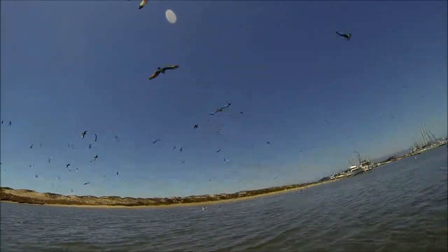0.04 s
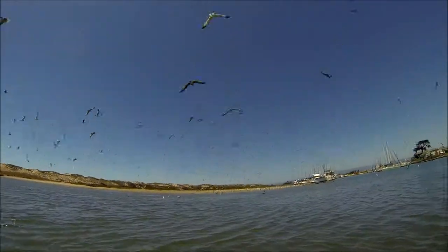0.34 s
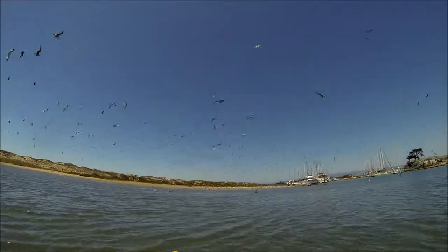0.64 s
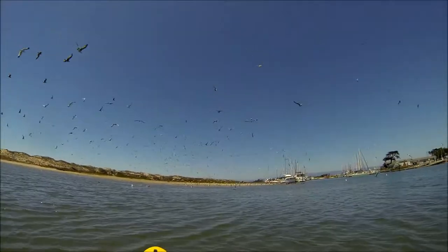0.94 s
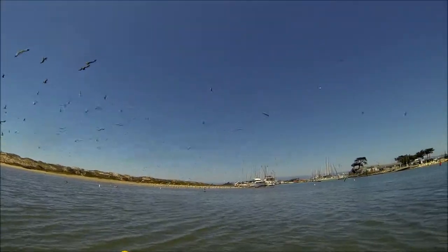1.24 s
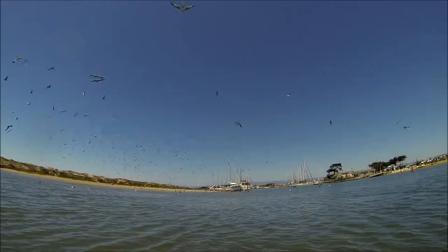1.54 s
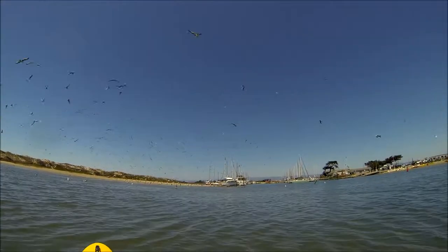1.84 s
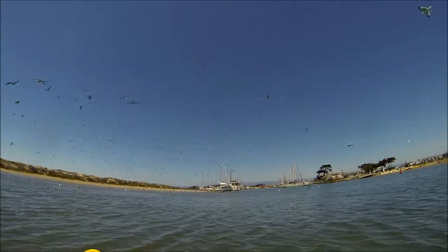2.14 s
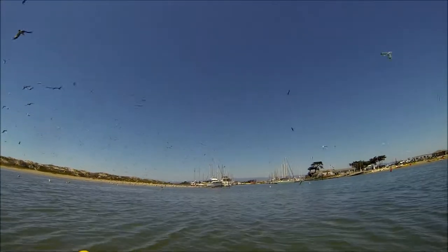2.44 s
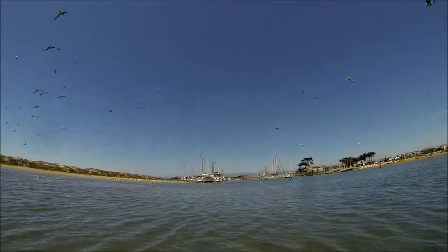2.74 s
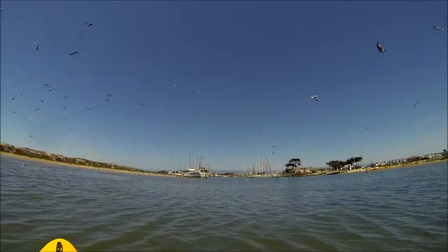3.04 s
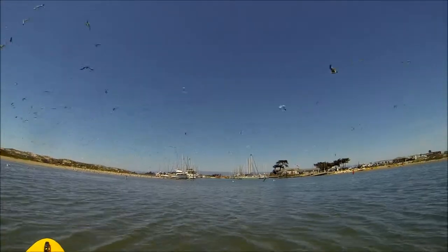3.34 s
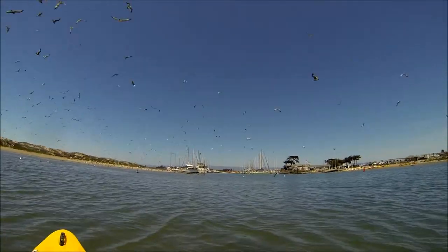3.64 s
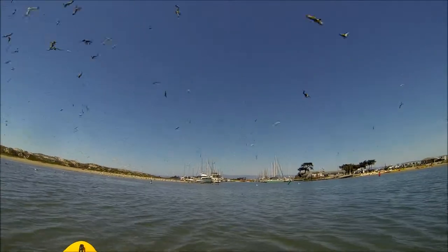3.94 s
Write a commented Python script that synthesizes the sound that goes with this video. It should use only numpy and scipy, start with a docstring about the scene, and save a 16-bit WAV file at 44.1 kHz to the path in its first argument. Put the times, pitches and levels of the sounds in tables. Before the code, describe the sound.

A colony of gulls cries and squawks over calm water, with low wind on the microphone. A small wave thumps the kayak once, then the wind buffets harder and the squawks thin out before crowding in again.

```python
"""A gull colony calls across a harbour, heard from a kayak on calm water.
From the start, wind rumbles on the microphone over a soft wash, distant chatter and a faint camera whine.
Clear gliding cries and harsh squawks, pulsed through throat and bill, stand out with a short shore echo.
Just before 1.9 s one small wave slaps and thumps the hull. The squawks thin out, the wind buffets
harder, and from about 3 s the squawks crowd in again among the cries."""
import sys
import numpy as np
from scipy import signal
from scipy.fft import rfft, irfft
from scipy.io import wavfile

SR = 44100
rng = np.random.default_rng(int(sys.argv[2]) if len(sys.argv) > 2 else 0)


def transcribe(signal):
    """Save signal, clipped to [-1, 1], as a 16-bit WAV file at the path in sys.argv[1]."""
    frames = np.atleast_2d(signal).T
    limited = np.clip(frames, -1, 1)
    pcm = np.round(limited * 32767).astype(np.int16)
    wavfile.write(sys.argv[1], SR, pcm)


N = 176400
T = np.arange(N) / SR


def amp(db):
    """Decibels to gain."""
    return 10 ** (np.asarray(db) / 20)


def unit(x):
    """Scales to rms 1."""
    return x / np.sqrt(np.mean(x ** 2) + 1e-20)


def level_at(spectrum, hz):
    """Reads an EQ curve on a log-frequency axis."""
    freqs, levels = np.transpose(spectrum)
    return np.interp(np.log(hz + 1), np.log(freqs + 1), levels)


def colour(x, spectrum, tilt_db=0):
    """Applies an EQ curve, tilted by tilt_db per octave; rms 1."""
    hz = np.fft.rfftfreq(len(x), 1 / SR)
    gain = amp(level_at(spectrum, hz) + tilt_db * np.log2(hz / 1000 + .01))
    return unit(irfft(rfft(x) * gain, len(x)))


def wander(size, rate_hz):
    """Smooth random modulation up to about rate_hz; rms 1."""
    padded = size + SR // 4
    hz = np.fft.rfftfreq(padded, 1 / SR)
    return unit(irfft(rfft(rng.standard_normal(padded)) / (1 + (hz / rate_hz) ** 4)))[:size]


def add(mix, start_s, sound):
    """Mixes a sound in at a time."""
    part = mix[max(round(start_s * SR), 0):][:len(sound)]
    part += sound[:len(part)]


def camera_whine():
    """Faint, steady high tones from the camera."""
    # whine tones: (frequency [Hz], rms level [dB])
    tones = [(10643, -84), (10691, -94), (13189, -89.5)]
    return sum(np.sqrt(2) * amp(db) * np.sin(2 * np.pi * hz * T) for hz, db in tones)


def water_wash():
    """A gently wavering bed of open water and microphone hiss."""
    # wash and hiss EQ: (frequency [Hz], relative level [dB])
    spectrum = [(100, -13.5), (250, 5.5), (385, 1.5), (480, 0), (700, -2), (950, -6), (2000, -13),
                (4000, -16), (6500, -23), (8300, -24), (10000, -39), (12000, -42), (13500, -25),
                (15300, -30)]
    return amp(-63.5) * colour(rng.standard_normal(N), spectrum) * amp(.5 * wander(N, rate_hz=2.7))


def wind():
    """Wind on the microphone: deep buffeting and a lighter rumble, each with its own gusts."""
    # wind EQ: (frequency [Hz], relative level [dB])
    spectrum = [(0, -70), (4, -48), (10, 0.5), (18, -5), (28, 1), (47, -2), (65, -12.5), (100, -17),
                (125, -19), (160, -28), (220, -36.5), (320, -55), (600, -63), (1500, -94)]
    # gusts of the deep buffeting: (time [s], level [dB])
    buffet = [(0, -36.5), (.9, -35.5), (1.7, -37), (2.0, -28), (2.35, -32.5), (2.9, -28), (3.15, -28.5),
              (3.35, -38), (3.55, -30.5), (4, -35.5)]
    # gusts of the upper rumble: (time [s], level [dB])
    rumble = [(0, -47.5), (.5, -40), (1.1, -45), (1.3, -37), (1.5, -45.5), (2.1, -41), (2.6, -47.5),
              (3.3, -45), (4, -46.5)]
    crossover_hz = 58.8
    low_share = 1 / (1 + (np.fft.rfftfreq(N, 1 / SR) / crossover_hz) ** 8)
    out = np.zeros(N)
    for share, gusts in ((low_share, buffet), (1 - low_share, rumble)):
        noise = colour(rng.standard_normal(N), spectrum)
        band = unit(irfft(rfft(noise) * np.sqrt(share), N))
        out += band * amp(np.interp(T, *np.transpose(gusts)))
    return out


def shore_echo(x, t60_s=.22):
    """A short tail of scattered reflections from water, boats and bank."""
    t = np.arange(SR) / SR
    reflections = rng.standard_normal(SR) * (rng.random(SR) < .05)
    tail = reflections * amp(-60 * t / t60_s) * (t > .004)  # 4 ms pre-delay
    return amp(-8.5) * signal.fftconvolve(x, tail / np.linalg.norm(tail))[:N]


def colony(calls_per_s=10):
    """Many far cries, smeared by echoes, over a blur of farther ones."""
    # distant chatter EQ: (frequency [Hz], relative level [dB])
    spectrum = [(800, -42), (1130, -14), (1330, -5), (1480, -2), (1680, -6.5), (1950, -16.5), (2300, -19.5),
                (2700, -13.5), (3200, -21.5), (3900, -27), (5200, -29.5), (7000, -32)]
    blur = amp(-61.3) * colour(rng.standard_normal(N), spectrum) * amp(.69 * wander(N, rate_hz=21))
    far = np.zeros(N)
    for when, pitch, size, fall in rng.random((int(calls_per_s * N / SR), 4)):
        hz = 1470 * (1 + .25 * (pitch - .5))
        db = -67 + 6 * (size - .5)
        length = .12 * (.5 + size)
        glide = (hz * .98, hz, hz * (1 - .083 * fall))
        add(far, when * N / SR, cry(length, glide, harmonics_db=(db, db - 13)))
    return blur + far + amp(10) * shore_echo(far)


def wave_slap():
    """A wave pushes the hull, splashes, and leaves it ringing briefly."""
    # thumps on the hull: (time [s], width [s], peak level [dB], pressure sign)
    pushes = [(1.856, .006, -23, -1), (1.876, .0112, -10, 1)]
    # splashes and ticks: (time [s], decay [s], level [dB], brightness [dB/octave])
    splashes = [(1.848, .006, -42, -1), (1.853, .008, -33, -2), (1.868, .012, -42, -4),
                (1.8745, .006, -44.5, 6), (1.886, .0008, -53, 6)]
    # splash EQ: (frequency [Hz], relative level [dB])
    spectrum = [(200, -0.5), (600, -10.5), (1100, 1.5), (2000, 6), (2700, -21), (4000, -17), (7000, -30),
                (10000, -39), (15000, -59)]
    # hull resonances: (frequency [Hz], level [dB], time to fall 60 dB [s])
    hull_modes = [(147, -38, 0.13), (378, -47.5, 0.26), (723, -52, 0.16), (1040, -49.5, .15)]
    out, t = np.zeros(N), np.arange(SR // 4) / SR
    for when, width, db, sign in pushes:
        u = ((T - when) / width) ** 2
        out += np.sign(sign) * amp(db) * (1 - 2 * u) * np.exp(-u)  # a pulse between two opposite swings
    for when, decay, db, brightness in splashes:
        spray = colour(rng.standard_normal(len(t)), spectrum, brightness)
        envelope = np.exp(-(t / decay) ** 2) * np.minimum(t / .00073, 1)
        add(out, when, amp(db) * spray * envelope)
    for hz, db, t60 in hull_modes:
        add(out, pushes[0][0], amp(db - 60 * t / t60) * np.sin(2 * np.pi * hz * t))
    return out


def gesture(length, pitches, attack_s, release_s):
    """One call's pitch curve through evenly spaced points, and its loudness envelope."""
    t = np.arange(int(length * SR)) / SR
    curve = np.polyfit(np.linspace(0, 1, len(pitches)), pitches, len(pitches) - 1)
    fade_in = np.sin(np.pi / 2 * np.minimum(t / attack_s, 1))
    fade_out = np.sin(np.pi / 2 * np.minimum((length - t) / release_s, 1))
    return np.polyval(curve, t / length), fade_in * fade_out


def cry(length, pitches, harmonics_db, jitter=.004, flutter_db=1.8):
    """A nearly pure gliding voice whose harmonics flutter on their way over the water."""
    hz, envelope = gesture(length, pitches, attack_s=.014, release_s=.018)
    phase = 2 * np.pi * np.cumsum(hz * (1 + jitter * wander(len(hz), rate_hz=66))) / SR
    return envelope * sum(amp(db + flutter_db * wander(len(hz), rate_hz=32)) * np.sin(k * phase)
                          for k, db in enumerate(harmonics_db, 1))


def squawk(length, pitches, db, rough, bill_hz, bill_db, bill_width_octaves=.18):
    """Unsteady pulses and puffs of noise through the throat and a bill that opens and shuts."""
    # throat and open bill EQ: (frequency [Hz], relative level [dB])
    throat = [(700, -43), (1100, -26), (1350, -0.5), (1580, 2), (1850, -8), (2150, -9), (2600, -8.5),
              (3150, -9.5), (3700, -16.5), (4400, -24.5), (5200, -22.5), (6000, -38), (10000, -67)]
    hz, envelope = gesture(length, pitches, attack_s=.24 * length, release_s=.03)
    jitter = (.005 + .026 * rough) * wander(len(hz), rate_hz=209)
    cycles = np.cumsum(hz * (1 + jitter)) / SR
    pulses = unit(sum(np.cos(2 * np.pi * k * cycles) for k in range(1, 18)))
    puffs = unit((.3 + np.exp(-(cycles % 1) / .64)) * rng.standard_normal(len(hz)))
    freqs = np.geomspace(500, 12000, 200)
    bill_peak = bill_db * np.exp(-(np.log2(freqs / bill_hz) / bill_width_octaves) ** 2 / 2)
    tract = np.column_stack([freqs, level_at(throat, freqs) + bill_peak])
    breath_share = .52 * rough
    voice = np.sqrt(1 - breath_share) * colour(pulses, tract)
    voice += np.sqrt(breath_share) * colour(puffs, tract)
    # louder calls are brighter, and the treble closes at both ends of a call
    treble = signal.sosfiltfilt(signal.butter(4, 3400, "high", fs=SR, output="sos"), voice)
    opening_db = .5 * (db + 53.5) - 6 * np.linspace(-1, 1, len(hz)) ** 2
    voice += (amp(opening_db) - 1) * treble
    rasp = amp(3.3 * rough * wander(len(hz), rate_hz=290))
    return amp(db) * envelope * unit(voice * rasp)


def near_gulls(cry_gain_db=1.7):
    """The foreground birds: clear cries and harsh squawks that can be told apart."""
    # clear cries: (time [s], length [s], start, early, late and end pitch [Hz], levels of harmonics 1, 2 and 3
    # before the cry gain [dB]); the 1.63 s row is the strong third harmonic of the squawk at 1.613 s
    cries = [(0.11, 0.1, 1389, 1407, 1367, 1269, -57, -76, -88),
             (0.343, 0.085, 1468, 1434, 1399, 1362, -49, -62, -82),
             (0.43, 0.21, 2330, 2281, 2249, 2234, -70, -92, -98),
             (0.59, 0.09, 1407, 1373, 1343, 1316, -58, -79, -88),
             (0.72, 0.09, 1379, 1431, 1437, 1400, -64, -80, -90),
             (0.85, 0.11, 1460, 1480, 1530, 1600, -53, -68, -87),
             (0.955, 0.055, 1599, 1617, 1617, 1599, -48, -70, -80),
             (1.235, 0.05, 1544, 1579, 1594, 1589, -46, -74, -87),
             (1.36, 0.11, 1446, 1423, 1368, 1279, -65, -67, -90),
             (1.365, 0.18, 2114, 2029, 1926, 1804, -59, -63, -86),
             (1.63, 0.09, 1385, 1440, 1455, 1470, -52, -64, -76),
             (1.77, 0.105, 1575, 1616, 1607, 1550, -51.5, -62, -88),
             (1.925, 0.036, 1929, 1889, 1851, 1814, -64, -84, -90),
             (1.98, 0.07, 1345, 1371, 1372, 1349, -61, -69, -87),
             (2.185, 0.084, 1431, 1444, 1450, 1449, -50, -72, -90),
             (2.23, 0.11, 1369, 1348, 1337, 1334, -70, -72, -90),
             (2.39, 0.07, 1335, 1346, 1351, 1350, -72, -73, -88),
             (2.495, 0.215, 1298, 1324, 1313, 1145, -54, -69, -69),
             (2.505, 0.13, 1409, 1528, 1573, 1545, -50, -68, -88),
             (2.73, 0.068, 1404, 1412, 1448, 1514, -58, -72, -88),
             (3.015, 0.135, 1443, 1452, 1461, 1469, -53, -68, -89),
             (3.14, 0.1, 1784, 1756, 1727, 1699, -56, -74, -90),
             (3.23, 0.12, 1596, 1668, 1674, 1615, -55, -79, -86),
             (3.27, 0.088, 1400, 1451, 1422, 1315, -50, -72, -88),
             (3.48, 0.118, 1428, 1428, 1384, 1295, -55, -78, -88),
             (3.7, 0.22, 1940, 1982, 1895, 1775, -55, -63.5, -85),
             (3.71, 0.08, 1321, 1321, 1333, 1359, -57, -65, -84),
             (3.775, 0.155, 1365, 1392, 1368, 1465, -44.5, -63, -77),
             (3.932, 0.085, 2469, 2432, 2424, 2445, -55, -89, -100),
             (3.935, 0.08, 1463, 1425, 1391, 1359, -49, -80, -88)]
    # harsh squawks: (time [s], length [s], start, middle and end pitch [Hz], level [dB],
    # roughness [0-1], bill resonance [Hz], bill boost [dB])
    squawks = [(0.077, 0.16, 530, 540, 511, -55.5, 0.73, 1320, 14.5),
               (0.309, 0.061, 665, 676, 680, -63, 0.3, 2900, 9),
               (.87, 0.099, 747, 770, 845, -55.5, 0.48, 3460, 6),
               (0.944, 0.065, 793, 793.5, 780, -48, .25, 4030, 4.5),
               (.985, 0.18, 520, 512.3, 526, -51.5, 0.59, 2450, 5),
               (1.138, 0.094, 429.7, 433.5, 423, -48.5, 0.7, 2210, 9.5),
               (1.206, .11, 526, 534, 520, -49, 0.81, 1830, 10.5),
               (1.279, .08, 537, 542, 557, -54, 0.33, 3200, 1.5),
               (1.34, 0.05, 720, 711, 716, -58, 0.2, 5100, 20.5),
               (1.613, 0.12, 456, 481.4, 487, -56.5, 0.16, 3350, 8.5),
               (1.708, 0.06, 737, 770, 735, -48.5, 0.3, 4600, 0),
               (1.747, 0.099, 629, 611, 600, -58.5, 0.26, 3460, 11),
               (2.42, .16, 507, 508, 531, -58.5, 0.88, 1370, 10),
               (2.924, 0.14, 369, 372.6, 375, -53, 0.63, 2560, 3.5),
               (3.014, 0.17, 365.5, 367.5, 366.6, -50.5, 0.63, 2810, 10),
               (3.147, 0.091, 443.6, 437.4, 433, -48, 0.97, 2340, 10),
               (3.198, 0.14, 530, 552.7, 532.6, -51, 0.83, 1570, 6.5),
               (3.59, .13, 505.4, 519.4, 543, -53.5, 0.54, 3670, 1.5),
               (3.761, .16, 700, 686, 673, -51.5, 0.77, 1620, 3.5)]
    out = np.zeros(N)
    for start, length, *pitches, first, second, third in cries:
        add(out, start, amp(cry_gain_db) * cry(length, pitches, (first, second, third, third - 18)))
    for start, length, *pitches, db, rough, bill_hz, bill_db in squawks:
        add(out, start, squawk(length, pitches, db, rough, bill_hz, bill_db))
    return out


def scene():
    """Gulls, wind and water at one microphone."""
    gulls = near_gulls()
    water = water_wash()
    return (gulls + shore_echo(gulls) + colony() + wind() + wave_slap() + water)[None]


def record(dry, cutoff_hz=15400):
    """Adds the camera's whine, then a steep high cut."""
    high_cut = signal.firwin(511, cutoff_hz, window=("kaiser", 9), fs=SR)
    return signal.filtfilt(high_cut, 1, dry + camera_whine())


dry = scene()
out = record(dry)
transcribe(out)
```